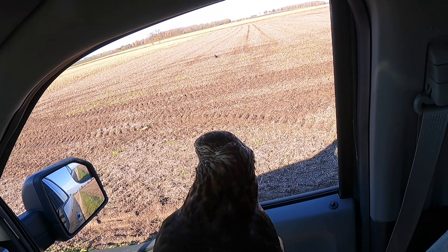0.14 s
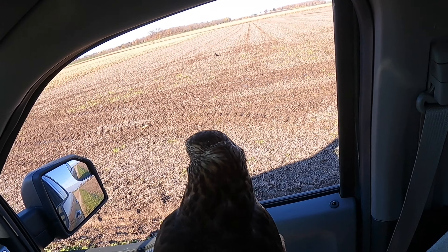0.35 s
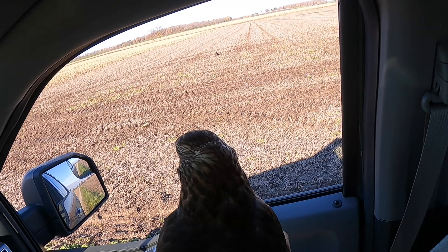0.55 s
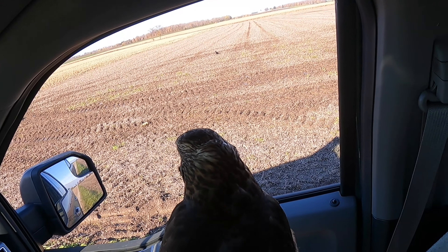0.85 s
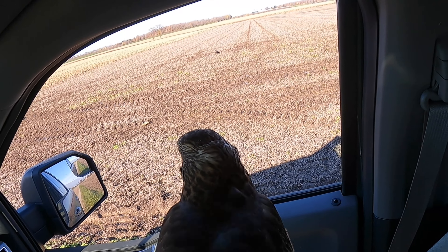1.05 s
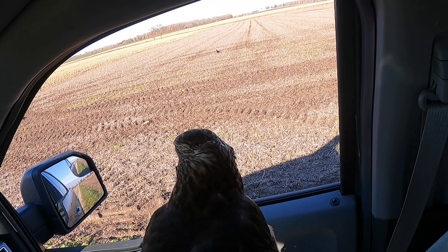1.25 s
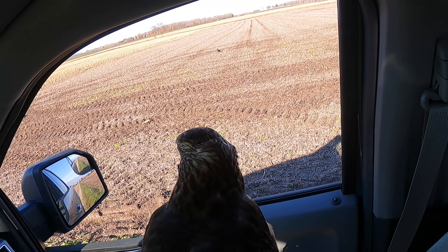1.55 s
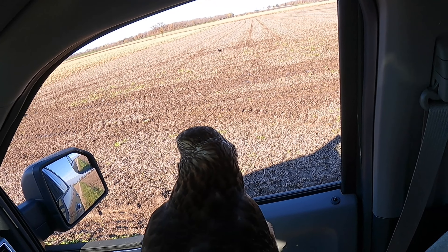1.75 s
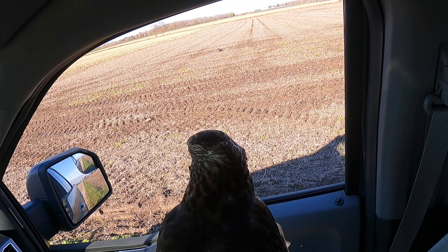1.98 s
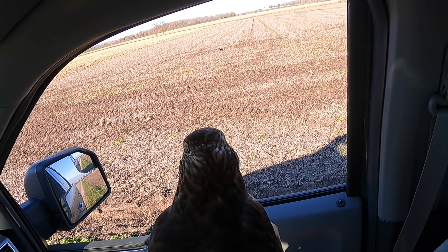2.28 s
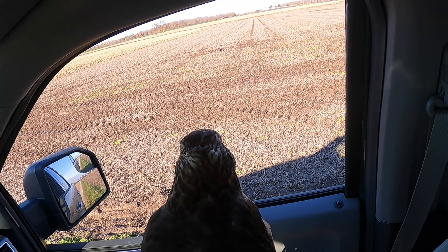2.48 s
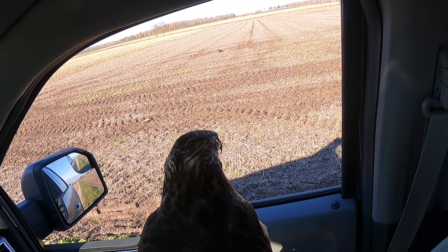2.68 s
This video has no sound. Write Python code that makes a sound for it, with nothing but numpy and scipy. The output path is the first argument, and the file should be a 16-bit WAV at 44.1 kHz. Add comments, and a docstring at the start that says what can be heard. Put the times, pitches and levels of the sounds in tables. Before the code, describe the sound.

Close in a parked vehicle with an open window, engine rumbling low, a hawk's little bells stay nearly silent, clink brightly, tinkle again with a tiny squeak, then feathers or cloth rustle and dull ticks follow.

```python
"""Small bells on a perched hawk, muffled by feathers, give short pips near 2.9 kHz and thin high rings.
The place is a parked vehicle, engine idling and a window open: hum, low rumble, throbs, clatter and air.
Brushes, dull bumps, a short squeak and one long slide, probably cloth or feathers, pass over it.
Pips, rings, squeak and hum are sines; the rubs and cabin air are shaped noise.
Two close microphone ports hear it all, with a steep cut of the top."""
import sys
import numpy as np
from scipy import signal
from scipy.fft import rfft, irfft
from scipy.io import wavfile
from scipy.ndimage import uniform_filter1d

SR = 44100
rng = np.random.default_rng(int(sys.argv[2]) if len(sys.argv) > 2 else 0)


def digitize_waveform(pressure):
    """Quantize a signal to 16-bit integers and store it at the path in sys.argv[1].

    Rows of a 2-D input are taken as channels; values are limited to [-1, 1].
    """
    field = np.atleast_2d(pressure).T
    bounded = np.clip(field, -1, 1)
    quanta = np.round(bounded * 32767).astype(np.int16)
    wavfile.write(sys.argv[1], SR, quanta)


N = 124362  # samples

# Every spectrum below is relative: its noise is brought to rms 1 before its level is set.
# Cabin air, spectrum: pitch_hz [Hz], level_db [dB per Hz]
AIR_SPECTRUM = [(70, -9.5), (88, -12), (110, -10.5), (150, -15.5), (242, -14), (348, -27.5), (500, -33.5),
                (630, -30), (860, -32.5), (1200, -31.5), (1510, -39.5), (1940, -31.5), (2430, -44.5),
                (3040, -45), (4000, -56.5), (5600, -52.5), (7500, -56), (9000, -61.5), (12000, -66),
                (15500, -92)]
AIR_DB, AIR_WAVER_DB = -50, 1.24
# Body rumble of the vehicle, spectrum: pitch_hz [Hz], level_db [dB per Hz]
RUMBLE_SPECTRUM = [(8, -13.5), (20, -0.5), (27, -4), (34, 5), (46, -5.5), (66, -5.5), (85, -18.5),
                   (200, -55), (2000, -110)]
RUMBLE_DB = -42.5
# Slow throbs of air and bodywork: centre_s [s], width_s [s], pitch_hz [Hz], level_db [dB peak]
THROBS = [(.71, 0.043, 37.97, -38), (1.46, 0.13, 35, -41.5), (2.06, 0.29, 20.57, -35.5),
          (2.72, 0.11, 20.5, -37)]
FIRING_HZ, FIRING_PITCH_WAVER = 58.13, 0.0093  # waver as a fraction of the pitch
FIRING_DB, FIRING_WAVER_DB = -45.5, 2.3
CLATTER_HZ, CLATTER_WIDTH_HZ, CLATTER_DB, CLATTER_WAVER_DB = 1212, 213, -63.5, 2.5

# Long rustle: time_s [s], body_db [dB], hiss_db [dB]
SLIDE = [(1.5, -110, -97), (1.62, -64, -74), (1.76, -53.5, -56), (1.87, -45, -52.5), (1.95, -37, -46.5),
         (2.04, -36, -41.5), (2.11, -36.5, -43), (2.17, -44, -42), (2.215, -46, -38.5), (2.26, -47, -53),
         (2.32, -53, -62.5), (2.42, -61.5, -63.5), (2.55, -70, -71.5), (2.82, -69, -74)]
# Body of the rustle, spectrum: pitch_hz [Hz], level_db [dB per Hz]
BODY_SPECTRUM = [(60, -20), (130, 1.5), (220, 5.5), (400, -9), (900, -4), (1500, -9.5), (2500, -13.5),
                 (5000, -20.5), (15500, -58)]
# Hiss of the rustle, spectrum: pitch_hz [Hz], level_db [dB per Hz]
HISS_SPECTRUM = [(200, -34), (900, -1), (2000, -2), (3800, -1), (5500, -7), (7300, -7.5), (8800, -15.5),
                 (12000, -21), (15500, -49)]
# Dull shifts of weight on the perch: peak_s [s], rise_s [s], fall_s [s], level_db [dB]
BUMPS = [(.65, 0.056, 0.041, -54.5), (1.09, .05, 0.14, -59), (1.24, 0.07, 0.09, -55),
         (1.372, 0.0056, 0.014, -46.5), (1.46, 0.13, 0.088, -56.5), (1.71, .03, 0.027, -54.5),
         (2.268, .003, 0.0072, -46), (2.36, .03, .05, -49.5), (2.6, 0.023, 0.027, -52),
         (2.681, 0.022, 0.019, -45), (2.74, .02, 0.046, -50)]
# Those shifts, spectrum: pitch_hz [Hz], level_db [dB per Hz]
BUMP_SPECTRUM = [(80, -18), (120, 0.5), (260, 2), (420, -11.5), (900, -18), (1600, -21.5), (3000, -52),
                 (15500, -68)]
# Light brushes and ticks: peak_s [s], rise_s [s], fall_s [s], level_db [dB]
BRUSHES = [(.47, 0.052, .05, -66), (.6535, .002, .006, -61), (.675, 0.078, .05, -58),
           (.714, .002, .004, -56), (.83, 0.085, 0.069, -61), (0.921, 0.035, 0.039, -56),
           (1.002, 0.0043, 0.0089, -44), (1.02, 0.056, 0.066, -56), (1.08, .015, 0.028, -60),
           (1.254, .002, .004, -54.5), (1.27, 0.06, .06, -61.5), (1.372, .005, 0.028, -56),
           (1.485, 0.066, .04, -47), (1.665, .002, 0.0045, -49.5), (1.68, 0.11, 0.039, -56.5),
           (1.766, .002, .005, -55), (2.436, .002, 0.0056, -57), (2.461, 0.047, 0.019, -54.5),
           (2.459, .002, 0.0057, -49), (2.48, .003, 0.0072, -50.5), (2.639, 0.0033, .015, -66),
           (2.75, .01, .02, -65)]
# Those brushes, spectrum: pitch_hz [Hz], level_db [dB per Hz]
BRUSH_SPECTRUM = [(200, -26), (600, -11), (1500, -1), (3500, -4), (5500, -10), (7400, -9.5), (8600, -16),
                  (12000, -19), (15500, -40)]
SLIPS_PER_S, SLIP_SPREAD_DB, SLIP_POWER_SHARE = 3500, 3.5, 0.32

SQUEAK_CENTRE_S, SQUEAK_WIDTH_S, SQUEAK_DB = 1.507, 0.017, -50.5
SQUEAK_HZ, SQUEAK_RISE_HZ_PER_S, SQUEAK_ROUGHNESS = 1370, 10000, 0.089  # pitch at the centre

# Free rings of the bell: start_s [s], low_db [dB, two low modes], high_db [dB, others], before RING_TRIM_DB
RINGS = [(0.974, -58.5, -68), (1.001, -59, -68), (1.014, -58.5, -61.5), (1.037, -72, -63), (1.10, -70, -84),
         (1.293, -68, -76), (1.423, -65, -55), (1.44, -80, -59), (1.465, -65, -59), (1.488, -76, -59.5),
         (1.56, -81, -74), (1.59, -85, -77), (1.68, -78, -81)]
# Upper modes of the bell, one list each: pitch_hz [Hz], level_db [dB, relative], ring time t60_s [s]
MODE_HZ = [5674, 6320, 9850, 11270, 12681, 14200]
MODE_DB = [-5, 0.5, 1.5, 0, -5.5, -16]
MODE_T60_S = [.28, 0.094, 0.14, 0.11, 0.1, 0.092]
RING_ATTACK_S, RING_TRIM_DB = 0.003, 3.5
TWIN_MEAN_SPLIT_HZ, TWIN_DB = 55, -10  # each mode has a weaker twin just below it
STRIKE_SCATTER_DB = 2.5  # each strike favours other modes

# Muffled bell taps: start_s [s], pitch_hz [Hz, nominal], level_db [dB, before TAP_TRIM_DB]
TAPS = [(.035, 3020, -58.5), (.143, 3080, -59.5), (.216, 2800, -64), (.252, 2960, -61), (0.267, 3080, -62),
        (0.9213, 2840, -28.5), (.9255, 2860, -49), (.938, 2780, -58), (.953, 2900, -51), (.971, 2870, -33),
        (0.9916, 2840, -33), (1.0027, 2740, -42), (1.0093, 2875, -25), (1.025, 2770, -31.5),
        (1.0436, 2760, -37), (1.069, 2950, -47), (1.082, 2980, -52), (1.096, 2930, -47.5),
        (1.144, 3050, -48), (1.186, 2990, -51), (1.223, 2810, -44), (1.2608, 2830, -38.5),
        (1.291, 3000, -47), (1.302, 2880, -43), (1.348, 2850, -45.5), (1.399, 2810, -50),
        (1.465, 2830, -33.5), (1.472, 2870, -36.5), (1.5, 2920, -42), (1.557, 2880, -46),
        (1.573, 2870, -45.5), (1.594, 2900, -50), (1.673, 2850, -46.5), (1.685, 2910, -44),
        (1.735, 2820, -49), (1.749, 2880, -45.5)]
TAP_MEDIAN_S, TAP_LENGTH_SCATTER, TAP_GLIDE_HZ, TAP_TRIM_DB = 0.0054, 0.26, 70, 2
TREMBLE_DB, TREMBLE_DECAY_S, TREMBLE_WIDTH_HZ = -18.5, 0.015, 360

# Nearby glass and trim, about 1.5 and 2.7 m of extra path: delay_s [s], left_db [dB], right_db [dB]
ECHOES = [(.0043, -7.5, -8.5), (.0079, -30, -26)]
TAIL_T60_S, TAIL_DB = 0.052, -7.5
# How much louder each source is on the left, by source: level_db [dB]
LEFT_DB = dict(tap=0, ring=5, brush=3.5, body=0.6, hiss=3.5, cabin=1, rumble=3.5)
# Amplitude of the left-right opposed part of each noise, by source: width [ratio]
WIDTH = dict(brush=0.24, body=0.15, hiss=0.23, cabin=0.18)
# Microphone ports: pitch_hz [Hz], phase by which the right port leads [radians]
PORT_PHASE = [(0, 0), (120, 0.09), (340, 0.93), (3000, 0.89), (5500, 0.61), (9000, 1)]
TOP_HZ = 15600


def undb(db):
    """Amplitude for a level in decibels."""
    return 10 ** (np.asarray(db) / 20)


def unit(x):
    """Bring a signal to rms 1."""
    return x / np.sqrt(np.mean(x ** 2))


def pan(db):
    """Left and right gains for a level difference between the ports."""
    return undb(np.array([[db], [-db]]) / 2)


def walk(rate):
    """Smooth random drift with a spread near 1, drawn afresh at a rate in Hz."""
    k = int(SR / rate)
    steps = np.repeat(rng.standard_normal(N // k + 1), k)
    return 1.374 * uniform_filter1d(uniform_filter1d(steps, k), k)[:N]


def colour(x, spectrum):
    """Shape a signal to a spectrum, falling steeply below its first point; rms 1."""
    hz, db = np.array(spectrum, float).T
    f = np.fft.rfftfreq(N, 1 / SR) + 1e-3  # keeps the logarithm finite
    low_cut = np.minimum(f / hz[0], 1) ** 4
    gain = undb(np.interp(np.log(f), np.log(hz), db))
    return unit(irfft(rfft(x) * low_cut * gain, N))


def resonant_noise(hz, width_hz):
    """Noise gathered around one pitch, as from a damped resonance; rms 1."""
    off = (np.fft.rfftfreq(N, 1 / SR) - hz) / width_hz
    return unit(irfft(rfft(rng.standard_normal(N)) / (1 + off ** 2) ** 2, N))


def spread(pair, width):
    """Left and right from a shared and an opposed signal."""
    return pair[0] + width * pair[1] * np.array([[1], [-1]])


def friction(width):
    """Dense tiny slips of fibres over a smooth hiss."""
    happens = rng.random((2, N)) < SLIPS_PER_S / SR
    strength = undb(SLIP_SPREAD_DB * np.minimum(rng.exponential(size=(2, N)), 4))
    slips = unit(happens * rng.standard_normal((2, N)) * strength)
    smooth = rng.standard_normal((2, N))
    return spread(np.sqrt(SLIP_POWER_SHARE) * slips + np.sqrt(1 - SLIP_POWER_SHARE) * smooth, width)


def swells(t, rubs):
    """Level of overlapping rubs that each rise and fall exponentially, added as power."""
    power = np.zeros(N)
    for peak, rise, fall, db in rubs:
        shape = np.exp(-np.maximum((peak - t) / rise, (t - peak) / fall))
        power += (undb(db) * shape) ** 2
    return np.sqrt(power)


def cabin_echo(x):
    """Direct sound, two close reflections and a very short decaying tail."""
    t = np.arange(8192) / SR
    tail = rng.standard_normal((2, len(t))) * undb(-60 * t / TAIL_T60_S)
    tail *= t > ECHOES[0][0]  # the tail follows the first reflection
    response = undb(TAIL_DB) * tail / np.sqrt(np.sum(tail ** 2, axis=1, keepdims=True))
    response[:, 0] += 1
    for delay, left_db, right_db in ECHOES:
        response[:, int(delay * SR)] += undb([left_db, right_db])
    return signal.fftconvolve(x[None], response, axes=1)[:, :N]


def idling(t):
    """Engine firing as a wavering hum, with body rumble, throbs of air, faint clatter and cabin air."""
    hum_hz = FIRING_HZ * (1 + FIRING_PITCH_WAVER * walk(3.82))
    hum_level = np.sqrt(2) * undb(FIRING_DB + FIRING_WAVER_DB * walk(8.24))  # root 2: rms to peak
    low = hum_level * np.sin(2 * np.pi * np.cumsum(hum_hz) / SR)
    low += undb(RUMBLE_DB) * colour(rng.standard_normal(N), RUMBLE_SPECTRUM)
    for centre, width, hz, db in THROBS:
        low += undb(db) * np.exp(-((t - centre) / width) ** 2) * np.sin(2 * np.pi * hz * t)
    clatter = resonant_noise(CLATTER_HZ, CLATTER_WIDTH_HZ)
    clatter *= undb(CLATTER_DB + CLATTER_WAVER_DB * walk(55))
    air = colour(spread(rng.standard_normal((2, N)), WIDTH["cabin"]), AIR_SPECTRUM)
    air *= undb(AIR_DB + AIR_WAVER_DB * walk(20))
    return low * pan(LEFT_DB["rumble"]) + (air + clatter) * pan(LEFT_DB["cabin"])


def long_rustle(t):
    """One firm slide of fibres: full-bodied in the middle, thin and bright just before it stops."""
    at, body_db, hiss_db = np.array(SLIDE).T
    body = undb(np.interp(t, at, body_db)) * colour(friction(WIDTH["body"]), BODY_SPECTRUM)
    hiss = undb(np.interp(t, at, hiss_db)) * colour(friction(WIDTH["hiss"]), HISS_SPECTRUM)
    return body * pan(LEFT_DB["body"]) + hiss * pan(LEFT_DB["hiss"])


def weight_shifts(t):
    """Dull bumps on the perch: friction noise with its weight in the lows."""
    return swells(t, BUMPS) * colour(friction(WIDTH["body"]), BUMP_SPECTRUM)


def brushes(t):
    """Light bright rubs and ticks of friction noise."""
    light = swells(t, BRUSHES) * colour(friction(WIDTH["brush"]), BRUSH_SPECTRUM)
    return light * pan(LEFT_DB["brush"])


def squeak(t):
    """Rubbing gives a short rough tone that rises during one brush."""
    age = np.clip(t - SQUEAK_CENTRE_S, -4 * SQUEAK_WIDTH_S, 4 * SQUEAK_WIDTH_S)
    pitch_hz = (SQUEAK_HZ + SQUEAK_RISE_HZ_PER_S * age) * (1 + SQUEAK_ROUGHNESS * walk(600))
    level = undb(SQUEAK_DB) * np.exp(-(age / SQUEAK_WIDTH_S) ** 2)
    return cabin_echo(level * np.sin(2 * np.pi * np.cumsum(pitch_hz) / SR))


def free_rings(t):
    """The pellet strikes the shell, whose thin upper modes ring in beating pairs."""
    out = np.zeros((2, 2 * N))  # room for rings that outlast the end
    age = t[:SR // 2]
    attack = np.minimum(age / RING_ATTACK_S, 1)
    for start, low_db, high_db in RINGS:
        at = int(start * SR)
        for k, (hz, mode_db, t60) in enumerate(zip(MODE_HZ, MODE_DB, MODE_T60_S)):
            phase, twin_phase, split = rng.random(3)
            twin_hz = hz - TWIN_MEAN_SPLIT_HZ * 2 * split
            tone = np.sin(2 * np.pi * (hz * age + phase))
            tone += undb(TWIN_DB) * np.sin(2 * np.pi * (twin_hz * age + twin_phase))
            strike_db = (low_db if k < 2 else high_db) + STRIKE_SCATTER_DB * rng.standard_normal()
            fade = undb(RING_TRIM_DB + mode_db + strike_db - 60 * age / t60)
            out[:, at:at + len(age)] += tone * fade * attack
    return out[:, :N] * pan(LEFT_DB["ring"])


def muffled_taps(t):
    """Each tap swells and dies in milliseconds on the bell's lowest note; the shell trembles on faintly."""
    pips, tremble_level = np.zeros(N), np.zeros(N)
    for start, hz, db in TAPS:
        longer, glide = rng.standard_normal(2)
        length = TAP_MEDIAN_S * np.exp(TAP_LENGTH_SCATTER * longer)
        age = np.maximum(t - start, 0)
        part = np.minimum(age / length, 1)  # 0 to 1 through the tap
        gliding_hz = hz + TAP_GLIDE_HZ * glide * (part - 1)
        level = undb(db + TAP_TRIM_DB)
        pips += level * np.sin(np.pi * part) ** 2 * np.sin(2 * np.pi * gliding_hz * age)
        tremble_level += level * undb(TREMBLE_DB) * part * np.exp(-age / TREMBLE_DECAY_S) / undb(TAP_TRIM_DB)
    mean_hz = np.mean([hz for _, hz, _ in TAPS])
    tremble = tremble_level * resonant_noise(mean_hz, TREMBLE_WIDTH_HZ)
    return cabin_echo(pips + tremble) * pan(LEFT_DB["tap"])


def scene():
    """The idling cabin, then the rubs, then the bells."""
    t = np.arange(N) / SR
    background = idling(t)
    rubs = long_rustle(t) + weight_shifts(t) + brushes(t) + squeak(t)
    bells = free_rings(t) + muffled_taps(t)
    return background + rubs + bells


def record(dry):
    """Two close microphone ports, the right leading in phase, and a steep cut of the top."""
    lead = np.interp(np.fft.rfftfreq(2 * N, 1 / SR), *np.array(PORT_PHASE).T)
    mirrored = np.concatenate([dry[1], dry[1, ::-1]])  # avoids a jump where the transform wraps
    right = irfft(rfft(mirrored) * np.exp(1j * lead))[:N]
    top_cut = signal.ellip(8, .2, 70, TOP_HZ, fs=SR, output="sos")
    return signal.sosfilt(top_cut, np.array([dry[0], right]))


dry = scene()
out = record(dry)
digitize_waveform(out)
```